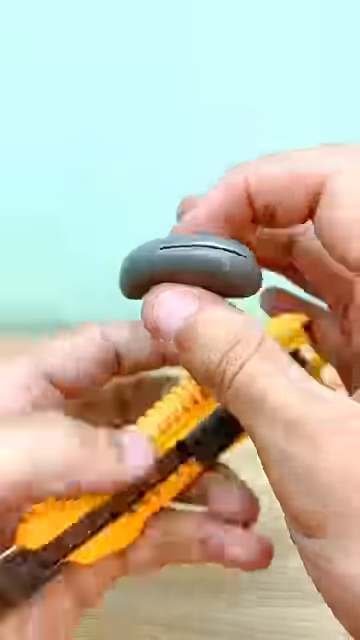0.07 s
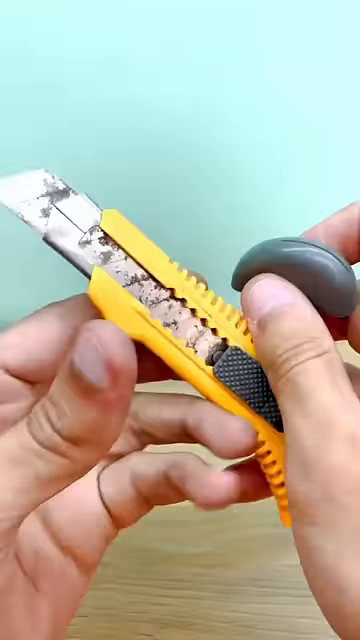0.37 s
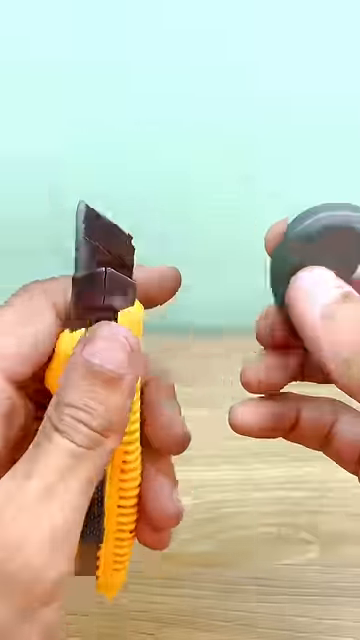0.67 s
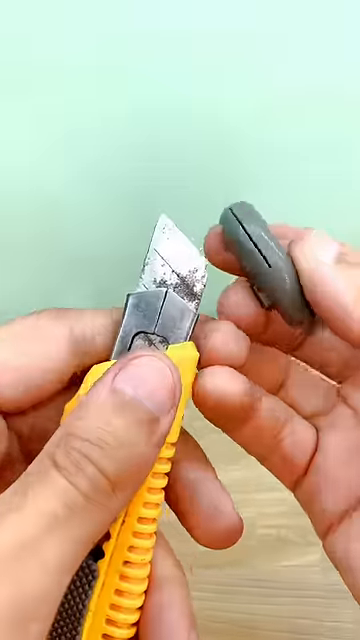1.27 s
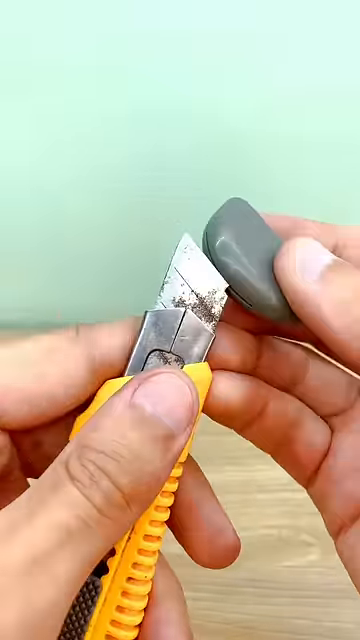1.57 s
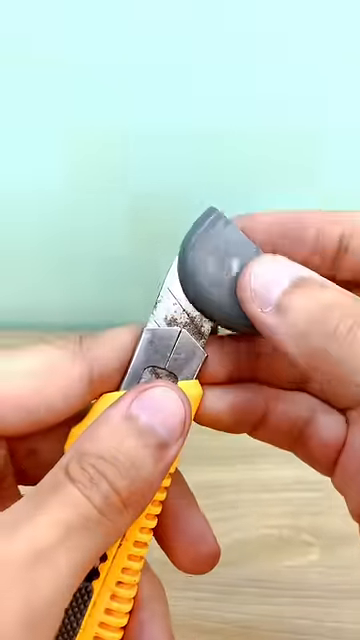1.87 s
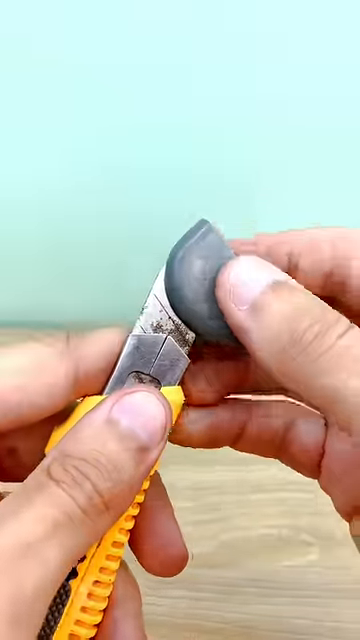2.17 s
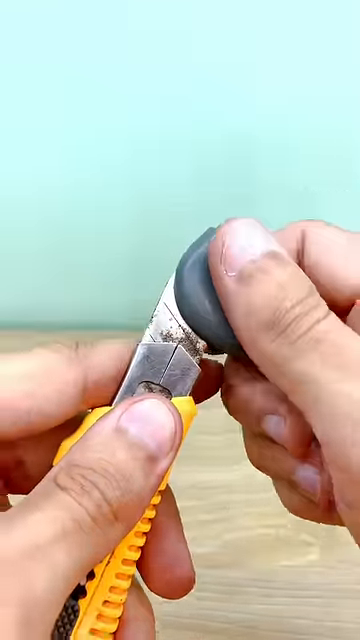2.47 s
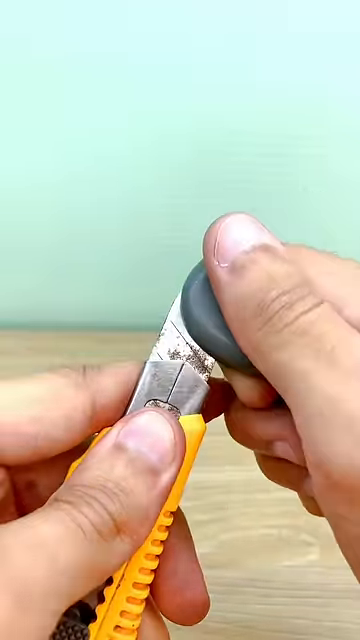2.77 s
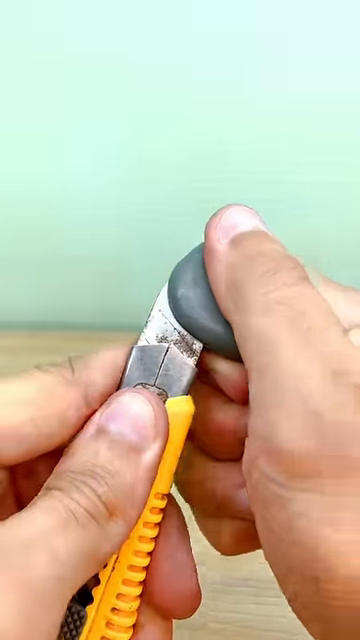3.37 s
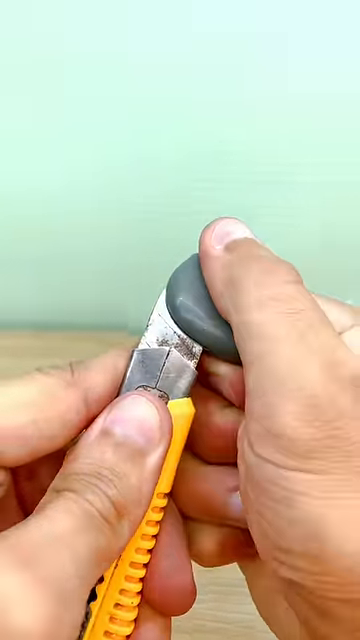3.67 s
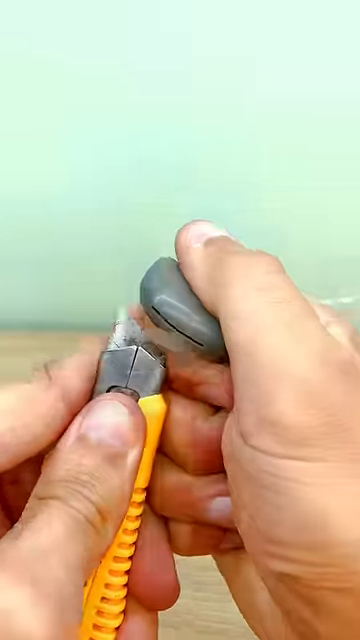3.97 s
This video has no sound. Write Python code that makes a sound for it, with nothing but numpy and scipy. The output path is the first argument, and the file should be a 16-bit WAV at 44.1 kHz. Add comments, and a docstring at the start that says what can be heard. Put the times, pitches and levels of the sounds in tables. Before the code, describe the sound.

Close up in a quiet room, a utility knife's blade and slider click sharply in their plastic handle. After a pause come light, scattered ticks and rubs of plastic on steel, a hollow tock and a short, hard scrape.

```python
"""A small quiet room, a stereo pair of microphones close to two hands turning a snap-off knife.
In the first second the loose blade and slider clack in the plastic handle and the steel rings briefly.
From 1.6 s a small slotted plastic piece ticks and rubs against the blade; at 3.7 s it seats with a
hollow tock. Just before 4 s it catches in one hard scrape with a thump. Faint room tone lies underneath."""
import sys
import numpy as np
from scipy import signal
from scipy.fft import rfft, irfft
from scipy.io import wavfile
from scipy.ndimage import uniform_filter1d

SR = 44100
rng = np.random.default_rng(int(sys.argv[2]) if len(sys.argv) > 2 else 0)


def wav_record(signal):
    """Record a signal, one row per channel, as 16-bit PCM in the file named by sys.argv[1]."""
    frames = np.transpose(np.atleast_2d(signal))
    bounded = np.clip(frames, -1, 1)
    # unit amplitude maps onto the largest positive 16-bit level
    quanta = np.round(bounded * 32767).astype(np.int16)
    wavfile.write(sys.argv[1], SR, quanta)


N = 176400
RISE_S, CLACK_HOLD_S, TICK_HOLD_S = 0.00059, 0.0016, 0.00096

# colour of the plastic piece: frequency_hz, gain_db
PIECE_COLOUR = [(300, -32.5), (900, -20.5), (1400, -5), (2400, 0.5), (3200, -8.5), (4400, -0.5),
                (5500, -20), (8000, -35)]
# colour of the steel edge it touches: frequency_hz, gain_db
EDGE_COLOUR = [(1000, -55.5), (4300, -11.5), (6000, 5), (8200, 0.5), (9500, -0.5), (11000, 3.5),
               (14000, -8), (16500, -12.5)]


def amp(db):
    """Decibels to gain."""
    return 10 ** (np.asarray(db) / 20)


def unit(x):
    """Scales to rms 1."""
    return x / np.sqrt(np.mean(x ** 2) + 1e-20)


def curve_at(points, hz):
    """Reads a table on a log-frequency axis."""
    f, value = np.transpose(points)
    return np.interp(np.log(hz + 1), np.log(f + 1), value)


def add(mix, start_s, sound):
    """Mixes a stereo sound in at start_s."""
    start = round(start_s * SR)
    sound = sound[:, max(-start, 0):]
    part = mix[:, max(start, 0):][:, :sound.shape[1]]
    part += sound[:, :part.shape[1]]


def colour(x, points, spot_hz=None, spot_db=8.5, spot_octaves=.13, ripple_db=4.5, ripple_hz=330):
    """A part's resonances: the grip shifts them by chance, and the contact spot may favour one band."""
    hz = np.fft.rfftfreq(2048, 1 / SR)
    knots = np.arange(0, SR / 2, ripple_hz)
    ripple = np.interp(hz, knots, np.clip(rng.standard_normal(len(knots)), -2, 2))
    db = np.maximum(curve_at(points, hz), -80) + ripple_db * ripple
    if spot_hz:
        db = db + spot_db * np.exp(-.5 * (np.log2((hz + 1) / spot_hz) / spot_octaves) ** 2)
    log_gain = np.log(amp(np.r_[db, db[-2:0:-1]]))
    taps = np.fft.ifft(np.exp(np.conj(signal.hilbert(log_gain)))).real  # minimum phase
    return signal.fftconvolve(x, taps[None] / np.linalg.norm(taps), axes=1)[:, :x.shape[1]]


def microphone_pair(x):
    """Two unrelated signals become alike at the two microphones, the right one later in the treble."""
    # lead of the left microphone: frequency_hz, phase_rad
    left_lead = [(1500, 0), (2500, 1.5), (3300, .8), (4500, 3.1), (17000, 21)]
    # likeness of the two sides: frequency_hz, coherence (0-1)
    likeness = [(60, 1), (130, .7), (450, .2), (1300, .88), (5000, .96)]
    hz = np.fft.rfftfreq(N, 1 / SR)
    coherence = curve_at(likeness, hz)
    lag = np.exp(-1j * np.interp(hz, *np.transpose(left_lead)))
    left, unrelated = rfft(x)
    right = (coherence * left + np.sqrt(1 - coherence ** 2) * unrelated) * lag
    return irfft(np.array([left, right]), N)


def hand_shadow(x):
    """The hand shades the left microphone: a dip near 2.3 kHz, a slight lift lower down."""
    # left channel: frequency_hz, gain_db
    shade = [(1000, 2), (2300, -3), (3300, 0)]
    gain = amp(curve_at(shade, np.fft.rfftfreq(N, 1 / SR)))
    return np.array([irfft(rfft(x[0]) * gain, N), x[1]])


def room_tone(level_db=-67.5, waver_db=1):
    """The quiet room: low rumble and faint hiss, gently wavering."""
    # noise spectrum: frequency_hz, density_db
    spectrum = [(20, -16.5), (58, 1), (95, -9.5), (160, -17), (250, -23.5), (480, -15), (900, -28),
                (2000, -34), (5000, -41), (10000, -39), (11300, -32), (16000, -50.5)]
    hz, t = np.fft.rfftfreq(N, 1 / SR), np.arange(N) / SR
    noise = microphone_pair(rng.standard_normal((2, N)))
    tone = unit(irfft(rfft(noise) * amp(curve_at(spectrum, hz)), N))
    rates_hz = np.geomspace(.5, 8, 20)
    waver = unit(sum(np.sin(2 * np.pi * (f * t + rng.random())) / np.sqrt(f) for f in rates_hz))
    return amp(level_db + waver_db * waver) * tone


def room_tail(x, level_db=-20, size=16384):
    """The small room's short tail, faint at this close distance; its treble dies first."""
    # reverberation time: frequency_hz, t60_s
    decay = [(500, 0.26), (3000, 0.2), (16000, 0.17)]
    hz, t, bands = signal.stft(rng.standard_normal((2, size)), SR, nperseg=256)
    tail = signal.istft(bands * amp(-60 * t / curve_at(decay, hz)[:, None]), SR, nperseg=256)[1]
    return amp(level_db) * signal.fftconvolve(x, tail / np.linalg.norm(tail[0]), axes=1)[:, :N]


def hand_rumble():
    """The hands swing the knife round close to the microphones."""
    # strength of the movement: time_s, level_db
    movement = [(0, -75.5), (.08, -56), (.16, -70), (.21, -48.5), (.29, -67.5), (0.451, -63), (.9, -83.5)]
    # colour of the rumble: frequency_hz, gain_db
    spectrum = [(20, -5), (55, 9.5), (110, -7), (250, -34), (900, -73.5)]
    gain = amp(curve_at(spectrum, np.fft.rfftfreq(N, 1 / SR)))
    noise = irfft(rfft(rng.standard_normal(N)) * gain, N)
    return unit(noise) * amp(np.interp(np.arange(N) / SR, *np.transpose(movement)))


def friction(size, slips_per_s=700, spread_db=6, hiss=.45):
    """Tiny slips of uneven strength over a fine hiss."""
    slipping = rng.random(size) < slips_per_s / SR
    strength = amp(spread_db * np.minimum(rng.exponential(1, size), 3))
    slips = unit(slipping * strength * rng.choice([-1, 1], (2, size)))
    return unit(slips + hiss * rng.standard_normal((2, size)))


def rubs(range_db=35.5, sing_hz=2620, size=16384):
    """Plastic and steel slide briefly around the knocks; the plastic sings in one band."""
    # slides, swelling and fading by range_db: peak_s, swell_s, fade_s, plastic_db, steel_db
    slides = [ (0.038, 0.023, 0.0048, -32, -35), (0.069, 0.05, .06, -55, -49),
              (0.170, 0.05, 0.056, -45, -46), (0.314, 0.026, 0.034, -46, -50),
              (0.433, 0.046, 0.062, -42.5, -48), (.470, 0.032, 0.06, -63, -58),
              (0.608, 0.15, 0.19, -57, -53.5), (.724, 0.016, 0.074, -43, -40.5),
              (0.856, 0.032, 0.018, -63, -64.5), (1.692, 0.034, 0.0052, -39.5, -37),
              (1.698, 0.0075, 0.1, -54.5, -56.5), (1.890, 0.044, 0.06, -41, -41.5),
              (2.894, 0.02, 0.037, -49, -52.5), (2.927, 0.028, 0.042, -52.5, -68),
              (3.122, 0.028, 0.054, -50, -62.5)]
    out = np.zeros((2, N))
    t = (np.arange(size) - size / 2) / SR
    for peak_s, swell_s, fade_s, plastic_db, steel_db in slides:
        envelope = amp(-range_db * np.maximum(-t / swell_s, t / fade_s))
        slips = friction(size) * envelope
        plastic = amp(plastic_db) * colour(slips, PIECE_COLOUR, sing_hz)
        steel = amp(steel_db) * colour(slips, EDGE_COLOUR)
        add(out, peak_s + t[0], plastic + steel)
    return out


def contact(plastic, steel, plastic_db, steel_db, spot_hz, hold_s, t60, size=4096):
    """A short burst of dense chatter, heard through the plastic and through the steel."""
    t = np.arange(size) / SR
    envelope = np.minimum(t / RISE_S, 1) * amp(-60 * np.maximum(t - hold_s, 0) / t60)
    chatter = rng.standard_normal((2, size)) * envelope
    clack = amp(plastic_db) * unit(colour(chatter, plastic, spot_hz))
    snap = amp(steel_db) * unit(colour(chatter, steel, spot_hz))
    return (clack + snap) * np.sqrt(np.mean(envelope ** 2))


def held_blade_ring(size=8192):
    """The firmly held blade rings faintly after the plastic piece snaps off it."""
    # blade modes: pitch_hz, gain_db, t60_s
    modes = [(2450, -24.5, 0.06), (5880, -28, 0.11), (8000, -38.5, 0.31), (7600, -14.5, 0.0424),
             (11550, -29.5, 0.1)]
    t = np.arange(size) / SR
    ring = sum(amp(db - 60 * t / t60) * np.sin(2 * np.pi * (hz * t + rng.random((2, 1))))
               for hz, db, t60 in modes)
    return ring * np.minimum(t / RISE_S, 1)


def piece_ticks():
    """The plastic piece ticks against the firmly held blade."""
    # touches: start_s, plastic_db, steel_db, spot_hz, t60_s
    ticks = [ (1.603, -48.5, -55, 2580, 0.041), (1.675, -47, -43.5, 10700, 0.012),
             (1.6928, -27, -14, 7640, 0.0032), (1.8728, -50.5, -44, 11000, 0.036),
             (1.885, -43, -51, 5930, 0.02), (1.898, -40, -39, 1640, 0.017),
             (1.916, -36.5, -60.5, 2360, 0.004), (1.9420, -66, -45, 11400, 0.014),
             (1.946, -72, -45, 11540, 0.011), (2.063, -63.5, -65.5, 6400, 0.058),
             (2.188, -60, -67, 1600, 0.052), (2.626, -53, -63, 2540, 0.032),
             (2.804, -60.5, -63.5, 2620, 0.13), (2.854, -53, -56.5, 2300, 0.0095),
             (2.8871, -43.5, -57, 1980, 0.02), (2.89, -48, -47.5, 2160, 0.075),
             (2.8937, -44, -46, 9600, 0.013), (2.9167, -58, -43.5, 12100, 0.052),
             (2.9664, -59.5, -70, 2300, 0.014), (3.1246, -47, -60, 2660, 0.016),
             (3.1381, -44.5, -51, 1940, 0.02), (3.229, -73, -63, 12200, 0.007),
             (3.2418, -63, -52.5, 13000, 0.035), (3.441, -59.5, -62, 2090, 0.053),
             (3.499, -63.5, -58, 13980, 0.019), (3.7403, -43, -64, 1520, 0.021)]
    out = np.zeros((2, N))
    for start_s, plastic_db, steel_db, spot_hz, t60 in ticks:
        tick = contact(PIECE_COLOUR, EDGE_COLOUR, plastic_db, steel_db, spot_hz, TICK_HOLD_S, t60)
        add(out, start_s, tick)
        add(out, start_s, amp(steel_db) * held_blade_ring())
    return out


def dull_knocks(size=4096):
    """The piece seats with a hollow tock and the catch ends in a thump: one heavily damped mode each."""
    # tock and thump: start_s, pitch_hz, level_db, t60_s
    knocks = [(3.742, 1570, -31, .012), (3.9805, 90, -17.5, .09)]
    out, t = np.zeros((2, N)), np.arange(size) / SR
    mic_phase = np.array([[np.pi / 4], [-np.pi / 4]])
    for start_s, hz, db, t60 in knocks:
        envelope = amp(db - 60 * t / t60) * np.minimum(t / CLACK_HOLD_S, 1)
        add(out, start_s, envelope * np.sin(2 * np.pi * hz * t + mic_phase))
    return out


def hard_scrape(grit_db=-4.5, ring_db=-3.5, size=2048):
    """The blade catches in the slot: friction builds into ringing resonances and lets go."""
    # force on the slot: time_s, level_db
    force_curve = [(3.960, -85), (3.965, -46), (3.970, -41), (3.9745, -31), (3.980, -33), (3.985, -25),
                   (3.989, -13), (3.9925, -19), (3.995, -35), (4.0, -38)]
    # colour of the grit: frequency_hz, gain_db
    grit_colour = [(300, -3.5), (700, -10.5), (1500, 3.5), (3000, -19.5), (4500, 0.5), (8000, -14.5),
                   (9000, -15), (16000, -26)]
    # resonances: pitch_hz, width_hz, gain_db
    modes = [(903, 55, -2.5), (2690, 29, -3), (3040, 160, -4.5), (3478, 30, -3.5), (6457, 100, -8),
             (7875, 67.6, -3)]
    out, t = np.zeros((2, N)), np.arange(size) / SR
    start_s = force_curve[0][0]
    force = amp(np.interp(start_s + t, *np.transpose(force_curve)))
    slips = friction(size)
    scrape = amp(grit_db) * unit(force * colour(slips, grit_colour))
    for hz, width_hz, db in modes:
        resonance = np.exp(-np.pi * width_hz * t) * np.sin(2 * np.pi * hz * t)
        ring = irfft(rfft(slips) * rfft(resonance))
        scrape += amp(ring_db + db) * unit(force * ring)
    add(out, start_s, scrape * np.sqrt(np.mean(force ** 2)))
    return out


def loose_blade_ring(t60=0.12, spread_db=8.5, buzz_hz=130, buzz_depth=1.1, size=10000):
    """The loose blade jostles in its track as it rings, hand-damped; each knock favours other modes."""
    # modes of the steel blade: pitch_hz
    mode_hz = [1880, 2900, 4195, 5410, 6385, 6480, 7975, 8265, 9318, 10730, 12210, 15350]
    # strength of each mode: gain_db
    mode_db = [-19.5, -18.5, -10, -16.5, -12, -8, -10.5, -9, -3, -5, -3.5, -17.5]
    t = np.arange(size) / SR
    hz = np.array(mode_hz)[:, None]
    gain = amp(np.array(mode_db)[:, None] + spread_db * (2 * rng.random(hz.shape) - 1))
    jostle = unit(uniform_filter1d(rng.standard_normal((2, len(hz), size)), round(SR / buzz_hz), axis=2))
    waver = (1 + buzz_depth * (jostle[0] + 1j * jostle[1]) / np.sqrt(2)) / np.hypot(1, buzz_depth)
    turns = hz * t + rng.random(hz.shape) + .5 * rng.random((2,) + hz.shape)  # own phase at each mic
    ring = (gain * waver * np.exp(2j * np.pi * turns)).real.sum(1)
    envelope = np.minimum(t / RISE_S, 1) * amp(-60 * t / t60)
    return ring * envelope / np.sqrt(np.sum(gain ** 2) / 2)


def knife_clacks():
    """Blade and slider knock in the handle and leave the steel ringing."""
    # knocks: start_s, handle_db, steel_db, spot_hz, t60_s, ring_db
    clacks = [ (0.0392, -18.5, -16, 2582, 0.010, -65), (0.096, -30.5, -25.5, 5950, 0.026, -65.5),
              (0.1068, -35, -55.5, 1385, 0.024, -65.5), (0.1441, -30.5, -21, 10540, 0.032, -25),
              (0.179, -34.5, -33.5, 1372, 0.058, -47.5), (.1870, -54, -30, 10600, 0.035, -57),
              (0.242, -50.5, -51, 2552, 0.053, -51.5), (0.298, -51.5, -39, 10540, 0.025, -36),
              (0.317, -41.5, -31.5, 5580, 0.035, -61.5), (0.421, -34, -25, 7435, 0.036, -48.5),
              (0.4426, -36, -29.5, 2870, 0.071, -47.5), (0.4468, -30, -16.5, 7914, 0.035, -48.5),
              (0.454, -26.5, -33, 2820, 0.016, -47.5), (0.48, -49, -54, 2754, 0.024, -54.5),
              (0.5635, -43.5, -36.5, 5440, 0.016, -72), (0.607, -46, -39.5, 6400, 0.044, -45),
              (0.7098, -30, -18.5, 4255, 0.018, -24.5)]
    # colour of the plastic handle: frequency_hz, gain_db
    handle = [(350, -46), (850, -20.5), (1250, 1.5), (1800, 1.5), (2800, 6.5), (3700, -4), (4600, -22),
              (7000, -25)]
    # colour of the slider's steel snap: frequency_hz, gain_db
    slider = [(600, -54.5), (2000, -25), (4000, -2.5), (5200, 1), (7300, 1), (9000, -0.5), (10700, 5.5),
              (12300, -1), (14000, -9.5), (15400, -5.5), (16500, -23)]
    out = np.zeros((2, N))
    for start_s, handle_db, steel_db, spot_hz, t60, ring_db in clacks:
        add(out, start_s, contact(handle, slider, handle_db, steel_db, spot_hz, CLACK_HOLD_S, t60))
        add(out, start_s, amp(ring_db) * loose_blade_ring())
    return out


def scene():
    """The handling close to the microphones, with the room behind it."""
    knife = hand_shadow(microphone_pair(knife_clacks()))
    piece = microphone_pair(piece_ticks() + rubs() + hard_scrape())
    handling = knife + piece + dull_knocks()
    return handling + microphone_pair(room_tail(handling)) + hand_rumble() + room_tone()


def record(dry):
    """The recorder's band limit at 16.5 kHz."""
    lowpass = signal.firwin(255, 16500, window=("kaiser", 9), fs=SR)
    return signal.oaconvolve(dry, lowpass[None], "same")


dry = scene()
out = record(dry)
wav_record(out)
```